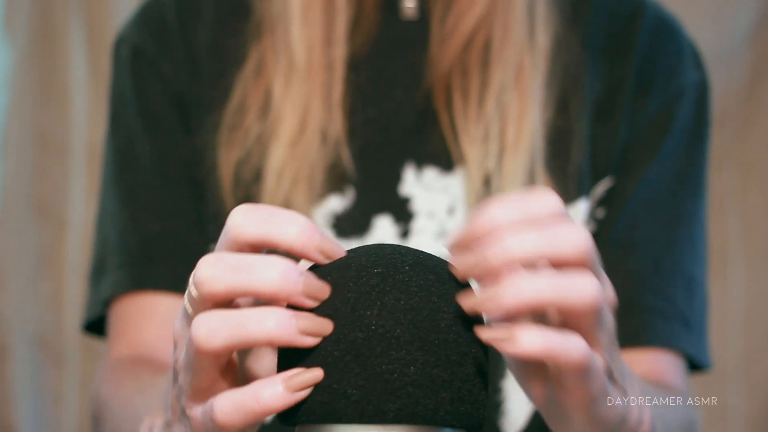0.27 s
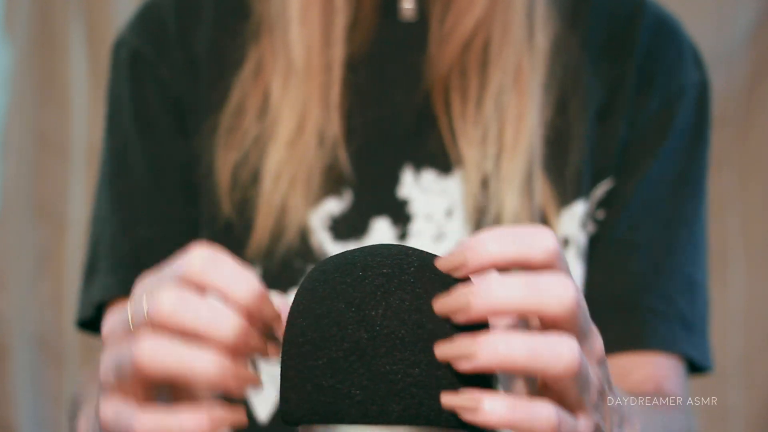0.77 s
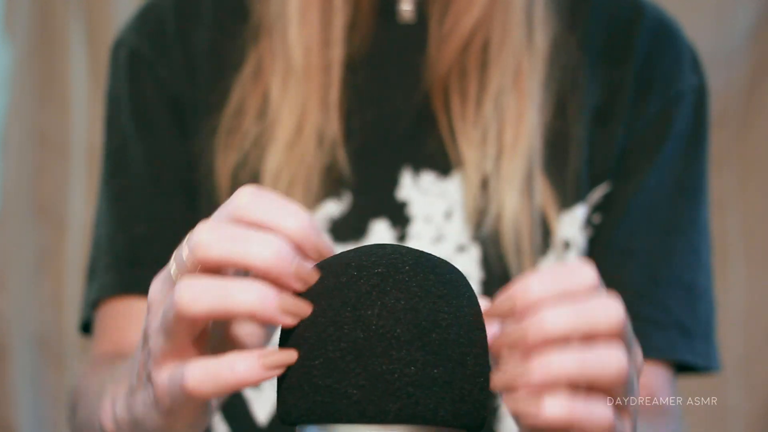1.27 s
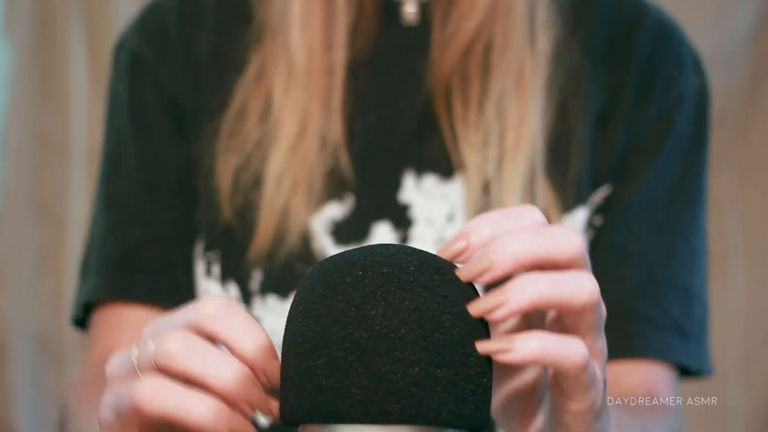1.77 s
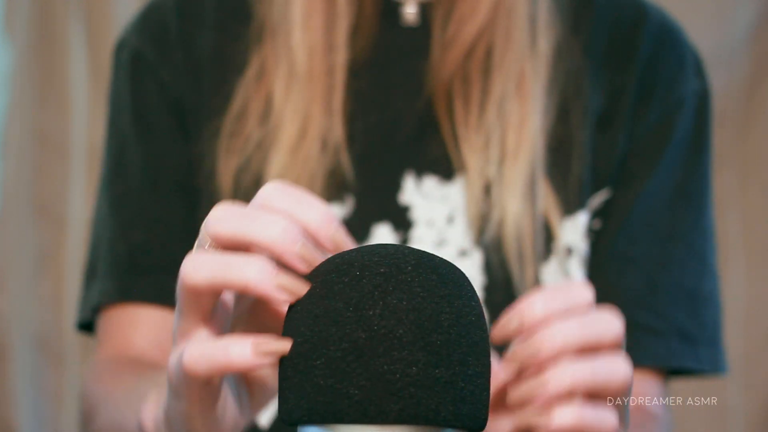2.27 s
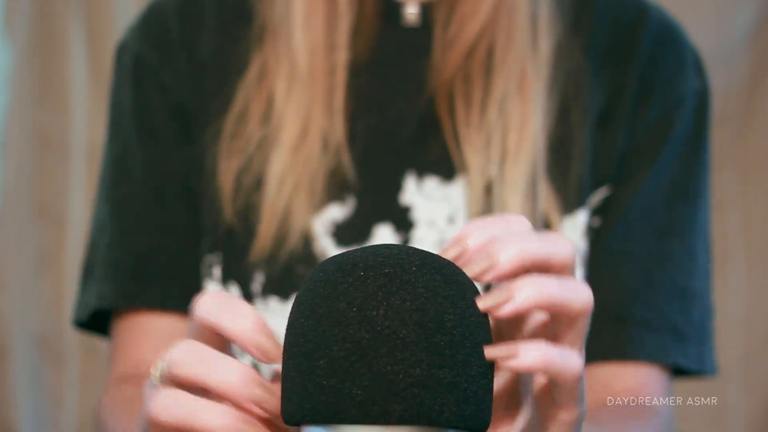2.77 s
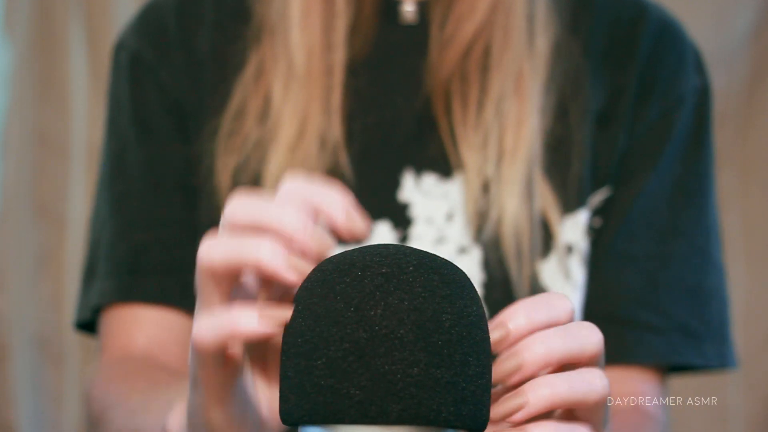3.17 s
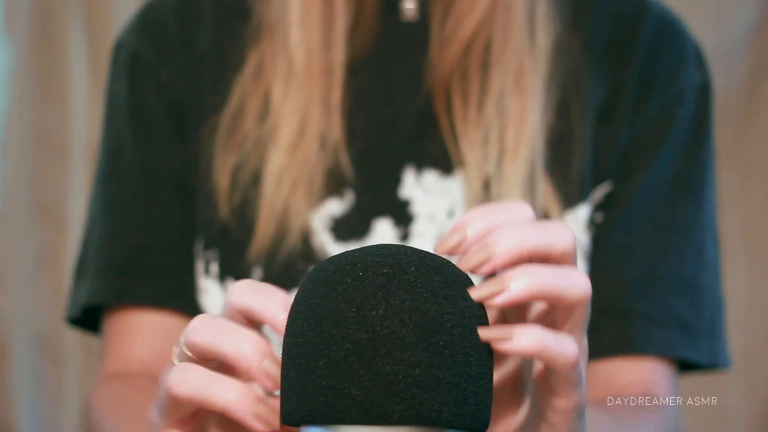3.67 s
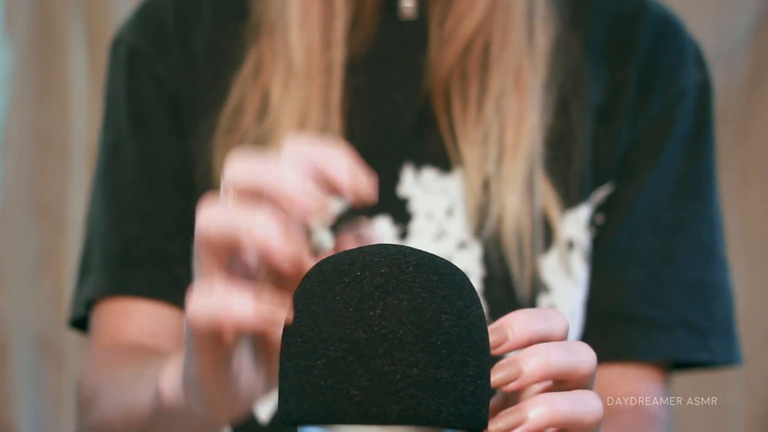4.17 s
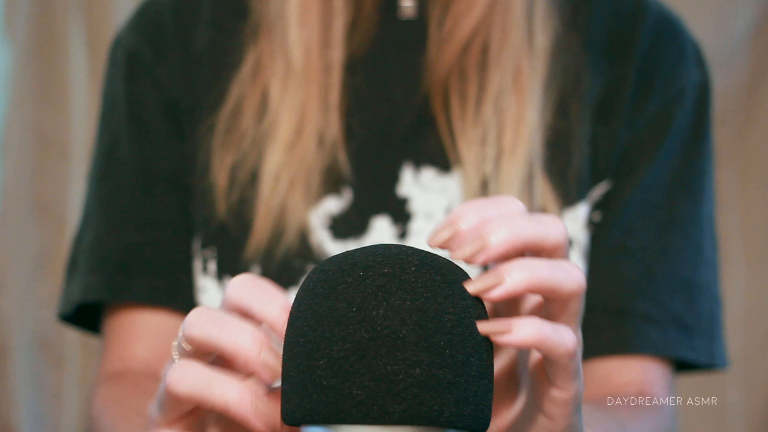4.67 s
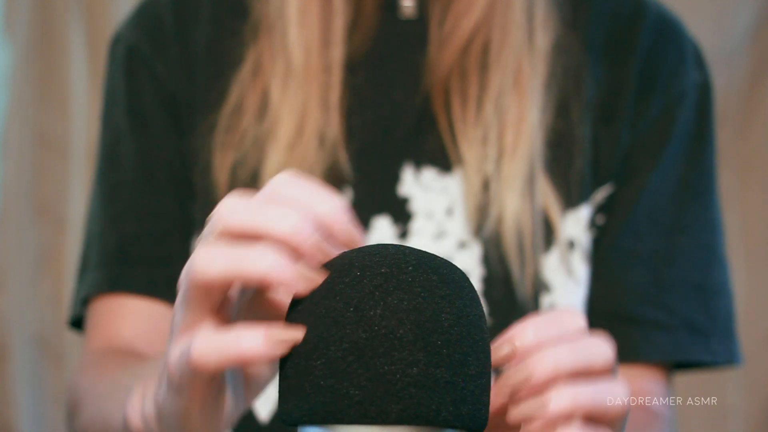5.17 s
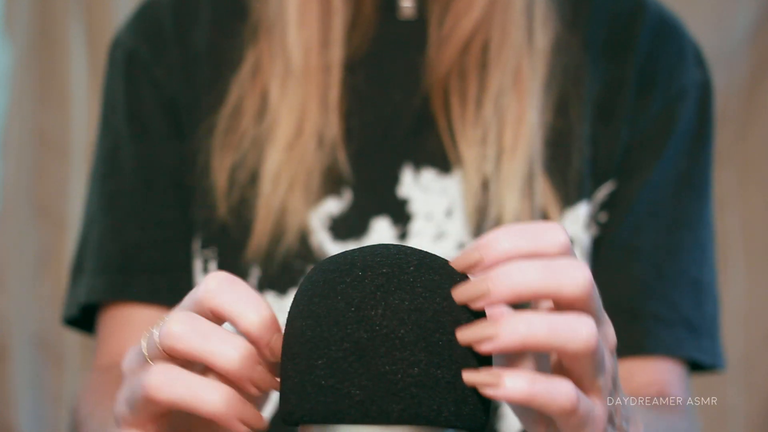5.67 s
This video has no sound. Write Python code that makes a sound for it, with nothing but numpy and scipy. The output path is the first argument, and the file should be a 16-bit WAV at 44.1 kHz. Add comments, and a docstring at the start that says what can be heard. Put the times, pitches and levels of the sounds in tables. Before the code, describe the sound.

Two hands take turns dragging long fingernails down a foam microphone cover, each stroke about half a second, one starting as the other lifts. Dense gritty crackle rides over a low boom from the shaken microphone. Small nail ticks, hollow foam plucks and a few soft air thumps, mainly on the left, punctuate the strokes. Extremely close, dry stereo, no audible room.

```python
"""Fingernails on a foam microphone cover

Two hands take turns dragging their fingernails down the foam cover of a stereo microphone.
Foam cells snap under the nails as dense random clicks over friction hiss; pinched pockets of foam ring and glide.
The drag shakes the microphone body, whose low modes boom, and each hand colours the two capsules in its own way.
Nails tick as they let go and pluck the foam; landing fingertips push puffs of air, mainly at the left capsule."""
import sys
import numpy as np
from scipy import signal
from scipy.fft import rfft, irfft, next_fast_len
from scipy.io import wavfile
from scipy.ndimage import uniform_filter1d

SR = 44100
rng = np.random.default_rng(int(sys.argv[2]) if len(sys.argv) > 2 else 0)


def bounce(signal):
    """Save signal as a 16-bit WAV file at the path given by the first command-line argument."""
    frames = np.transpose(np.atleast_2d(signal))
    limited = np.clip(frames, -1, 1)
    pcm = np.round(limited * 32767).astype(np.int16)
    wavfile.write(sys.argv[1], SR, pcm)


N = 260631
TIME_S = np.arange(N) / SR
SIZE = next_fast_len(N + SR // 2)   # padded, so filter tails do not wrap round
HZ = np.maximum(np.arange(SIZE // 2 + 1) * SR / SIZE, 1)
CLOSENESS = 0.16   # added to every likeness in the tables


def amp(db):
    """dB to gain."""
    return 10 ** (np.asarray(db) / 20)


def rms_one(x):
    """Scales each row to rms 1."""
    return x / np.sqrt(np.mean(x ** 2, axis=-1, keepdims=True))


def in_time(rows):
    """Draws straight lines between the rows of a curve table, one curve per column."""
    point_s, *columns = np.transpose(rows)
    return [np.interp(TIME_S, point_s, column) for column in columns]


def swell(centre_s, length_s, power=2):
    """A smooth rise and fall from 0 to 1 and back, down to 1/e at both ends of its length."""
    return np.exp(-(2 * (TIME_S - centre_s) / length_s) ** power)


def drift(rate_hz):
    """Slow chance: noise through a double one-pole low-pass, scaled to rms 1."""
    r = np.exp(-2 * np.pi * rate_hz / SR)
    noise = rng.standard_normal(N + SR)
    return rms_one(signal.lfilter([1], [1, -2 * r, r * r], noise)[SR:])


def even_out(swing, span_s):
    """Evens the power of a stereo swing over a span, with one gain for both channels."""
    power = uniform_filter1d(np.mean(swing ** 2, axis=0), round(span_s * SR))
    return swing * np.sqrt(power.mean() / power)


def to_capsules(pair, left_db, right_db, likeness, lead_rad):
    """Mixes the spectra of two unrelated streams to a stereo likeness and colours each capsule."""
    alike = np.clip(likeness + CLOSENESS, -.98, .98)
    common = np.sqrt((1 + alike) / 2) * pair[0]
    opposed = np.sqrt((1 - alike) / 2) * pair[1]
    left = amp(left_db) * (common + opposed)
    right = amp(right_db) * (common - opposed) * np.exp(1j * lead_rad)
    return np.sqrt(SR / 2) * np.array([left, right])


def struck(events, shape):
    """Places one shape per event, turned down on the weaker side."""
    out = np.zeros((2, N + SR))
    for start_s, level_db, left_minus_right_db, *rest in events:
        pulse, at = shape(*rest), round(start_s * SR)
        sides = amp([[min(left_minus_right_db, 0)], [min(-left_minus_right_db, 0)]])
        out[:, at:at + len(pulse)] += amp(level_db) * sides * pulse
    return out[:, :N]


# fingertips landing on the foam: (start_s, level_db, left_minus_right_db, pitch_hz)
LANDING_PUFFS = [(0.429, -42, 6, 72.7), (1.081, -13, 23, 32.3), (3.114, -18, 15, 53.8),
                 (4.145, -18, 7, 56.5), (4.549, -24, 7, 56.5), (5.074, -7.5, 25, 57.4),
                 (5.108, -12, 18, 48)]


def puff(pitch_hz):
    """A soft push of air: a cycle or two of a low tone that swells and dies."""
    t = np.arange(SR // 10) / SR
    envelope = np.exp(-((t - .026) / 0.0098) ** 2)
    return -amp(-5.5) * envelope * np.sin(2 * np.pi * pitch_hz * (t - .028))


def shaken(mode_hz, width_hz):
    """One body mode: noise through a resonance squared for steep skirts, its level evened over 150 ms."""
    ring = 1 / (1 + 1j * (HZ - mode_hz ** 2 / HZ) / width_hz) ** 2
    swing = irfft(rfft(rng.standard_normal((2, SIZE))) * ring, SIZE)[:, :N]
    return rfft(even_out(swing, span_s=0.15), SIZE)


# low modes of the microphone body as each hand shakes them, levels before the shake of the strokes:
# (pitch_hz, width_hz, left_db, right_db, likeness 0-1, right_lead_rad)
RIGHT_BODY_MODES = [(124.4, 17.6, -58, -52, 1, -3), (166, 17.7, -47, -40.5, 0.88, 0),
                    (186.9, 21, -39, -62.5, 1, 0.5), (206.8, 15.8, -36.5, -53, 0.97, -1.76)]
LEFT_BODY_MODES = [(105.8, 7, -51, -46, 0.67, -2.5), (149.6, 12.5, -43, -43, 0.91, -2),
                   (168.6, 16.7, -34, -38, 0.74, -2.5), (205, 37, -43, -76, 0.62, -2.5)]


def body(modes, shake_db):
    """Body modes swing together; their summed level is evened over 73 ms, then the hand sets the strength."""
    spectrum = sum(to_capsules(shaken(hz, width_hz), *capsules) for hz, width_hz, *capsules in modes)
    swing = irfft(spectrum, SIZE)[:, :N]
    return even_out(swing, span_s=0.073) * amp(shake_db)


# a nail catching and letting go: (start_s, level_db, left_minus_right_db)
NAIL_TICKS = [(0.2533, -44, 5.5), (0.4379, -46, 8), (0.5806, -40, -0.5), (0.631, -33.5, -8),
              (0.6614, -36, -11), (0.669, -38, -7), (0.7085, -41, -8), (0.7535, -36, -8), (0.7745, -35, -8),
              (0.784, -36.5, -8), (0.7965, -39, -8), (0.8255, -35, -11), (0.848, -42, -8),
              (0.8954, -44, -10.0), (1.3932, -49, 25), (1.5269, -51, 4), (1.6955, -40, -7.5),
              (2.0178, -41, -12.0), (2.7566, -41, -9.5), (2.8379, -44, -9.5), (3.3353, -50, 2),
              (3.4391, -48, 0), (3.6152, -50, -3.5), (3.6691, -41, -7), (3.7404, -44, -8),
              (3.9624, -50, -9.5), (4.4204, -43, -6), (4.4887, -42, 5), (4.5426, -46, 4),
              (4.6897, -38, -14.0), (4.7331, -41, -11.5), (4.8199, -35, -14), (4.839, -41, -13),
              (4.883, -43, -12), (5.3308, -51, 7), (5.5074, -34, -9), (5.5927, -40, -5.0),
              (5.6351, -44, -9.5), (5.7174, -35, -14.5)]
# what the nail rings with, levels before a random scatter: (pitch_hz, level_db, decay_s)
NAIL_RINGS = [(5200, 6, 0.00012), (13300, 7, 0.00015)]
DELAY_S = 0.0011   # delay from start_s to the crack


def tick():
    """A short bright crack: the released nail rings for a cycle or two."""
    t = np.maximum(np.arange(SR // 100) / SR - DELAY_S, 0)
    crack = 0
    for hz, level_db, decay_s in NAIL_RINGS:
        gain = amp(level_db + rng.normal(0, 1.5))
        crack = crack + gain * np.exp(-t / decay_s) * np.sin(2 * np.pi * hz * t)
    return rng.choice([-1, 1]) * crack


# a nail digging in and plucking the foam: (start_s, level_db, left_minus_right_db, pitch_hz)
FOAM_PLUCKS = [(1.687, -23, 4, 610), (1.75, -21, 8.0, 507), (0.94, -23, 6, 483), (0.985, -27, 9, 520),
               (1.048, -39, 8, 477), (2.171, -34, 5, 896), (2.377, -23.5, 0, 475), (3.465, -25.5, -2, 776),
               (3.772, -22, 7, 620), (4.086, -27, 5, 580), (4.733, -19.5, 9, 620), (4.881, -19, 18, 541),
               (5.753, -24, 10, 638)]


def pluck(pitch_hz):
    """A short damped ring of the foam."""
    t = np.arange(SR // 25) / SR
    decay = np.exp(-t / 0.0035)   # s
    return rng.choice([-1, 1]) * decay * np.sin(2 * np.pi * pitch_hz * t) * 1.1


def snaps(per_s, spread_db):
    """Foam cells snap at random moments with uneven size, as two click streams at rms 1."""
    sizes = amp(spread_db * np.minimum(rng.exponential(1, N), 2.8))
    struck_now = rng.random(N) < per_s / SR
    return rms_one(sizes * struck_now * rng.standard_normal((2, N)))


def gliding(hz, gain, width_hz, *capsules):
    """Snaps ring in a resonance whose pitch moves: shifted to 0 Hz, low-passed twice, shifted back."""
    turn = np.exp(2j * np.pi * np.cumsum(hz) / SR)
    r = np.exp(-np.pi * width_hz / SR)
    cells = snaps(per_s=900, spread_db=2.5)
    smoothed = signal.lfilter([(1 - r) ** 2], [1, -2 * r, r * r], cells * gain / turn)
    return to_capsules(rfft(2 * (turn * smoothed).real, SIZE), *capsules)


# the scrape sings briefly in a narrow band: (centre_s, length_s, start_hz, end_hz, level_db)
RIGHT_SINGING = [(0.95, 0.2, 560, 450, 1), (1.88, 0.25, 550, 408, 2.5), (2.9, 0.3, 565, 457, 2),
                 (3.83, 0.24, 650, 466, -1), (4.85, 0.24, 640, 428, 5), (5.02, 0.072, 1730, 1720, -8),
                 (5.8, 0.12, 596, 476, -2)]
LEFT_SINGING = [(0.66, 0.1, 1200, 1500, -6), (1.3, 0.08, 2250, 2260, -12), (1.61, 0.11, 750, 1150, 7),
                (2.65, 0.14, 650, 1100, 2), (3.54, 0.31, 750, 1100, 3), (4.4, 0.18, 755, 900, 4),
                (4.62, 0.1, 900, 1190, -7), (5.4, 0.1, 890, 1190, -2), (5.57, 0.086, 850, 1300, 0)]
# that band, levels before those above: (width_hz, left_db, right_db, likeness 0-1, right_lead_rad)
RIGHT_SINGING_BAND = (120, -62, -69, 0.8, 1.5)
LEFT_SINGING_BAND = (160, -65, -69, 1, -2.5)


def singing_scrape(songs, band):
    """Snaps excite a narrow gliding resonance that swells and fades."""
    glide, gain = [], 0
    for centre_s, length_s, start_hz, end_hz, level_db in songs:
        glide += [(centre_s - length_s / 2, start_hz), (centre_s + length_s / 2, end_hz)]
        gain = gain + amp(level_db) * swell(centre_s, length_s, power=4)
    hz, = in_time(glide)
    return irfft(gliding(hz, gain, *band), SIZE)[:, :N]


# pockets of foam pinched under the nails, levels before the scrape level of the strokes:
# (land_hz, lift_hz, width_hz, left_db, right_db, likeness 0-1, right_lead_rad)
RIGHT_FOAM_POCKETS = [(817, 419, 190, -61.5, -72, 0.86, 1.8), (2250, 1480, 420, -83.5, -88.5, 0.65, 4.4)]
LEFT_FOAM_POCKETS = [(620, 1187, 210, -78.5, -66, 0.27, -2.5), (723, 748, 180, -65, -70, 0.92, -2.5),
                     (1350, 1490, 260, -78.5, -75, 0.89, -4)]


def pocket(strokes, scrape_db, land_hz, lift_hz, *band):
    """A pinched pocket resonates and glides in pitch as the nails travel along each stroke."""
    glide = []
    for land_s, lift_s, *_ in strokes:
        glide += [(land_s, land_hz), (lift_s, lift_hz)]
    hz, = in_time(glide)
    return gliding(hz, amp(scrape_db), *band)


# centres of the squeeze, scrape, scratch and rasp layers: (pitch_hz)
LAYER_CENTRES_HZ = [80, 600, 3200, 10500]
# one band of the scratch swells or fades for a while: (centre_s, length_s, pitch_hz, change_db)
RIGHT_BAND_TINTS = [(0.76, 0.3, 5200, 2.5), (0.76, 0.25, 14000, 3), (0.946, 0.25, 2110, 2),
                    (1.744, 0.12, 1400, -2), (2.92, 0.15, 14000, 6), (2.95, 0.25, 523, 4.5),
                    (3.8, 0.3, 5500, -3.5), (4.85, 0.18, 13500, 7.5), (4.84, 0.12, 1900, 3),
                    (4.86, 0.2, 520, 9), (0.74, 0.17, 3500, -4), (2.798, 0.1, 530, 6),
                    (5.75, 0.22, 13500, 4)]
LEFT_BAND_TINTS = [(0.45, 0.4, 5840, 0), (1.3, 0.083, 2260, 5), (1.58, 0.16, 6000, 5),
                   (1.62, 0.15, 960, 2.5), (2.55, 0.2, 6030, 8), (2.64, 0.18, 850, 7.5),
                   (0.66, 0.08, 1510, 3), (3.5, 0.27, 850, 7), (3.5, 0.27, 330, -6), (4.42, 0.43, 850, 2),
                   (4.45, 0.4, 5600, 0), (4.5, 0.28, 330, 2), (5.45, 0.37, 1350, 4.5)]
BAND_HZ = np.geomspace(38, 14000, num=18)
TINT_OCTAVES = 0.42   # width of a tint, down to 1/e of its dB at the edges
SNAP_OCTAVES = 2.6   # a snap falls to 1/e this far from its own pitch
SNAP_DB, SNAP_DB_PER_OCTAVE = -1.0, 0.1   # snaps over hiss at 2 kHz, and the rise with pitch


def scratching(layers_db, tints):
    """Snaps over fine friction hiss, band by band: each snap fills its own span of pitch."""
    cells = snaps(per_s=2200, spread_db=3.8)
    hiss = rng.standard_normal((2, N))
    grip_db = 1.11 * (drift(197) + 0.4 * drift(9))   # shared by all bands
    snap_octave = rng.uniform(-3.5, 4, N)   # pitch of each snap, from 2 kHz
    layers = np.eye(len(LAYER_CENTRES_HZ))
    weights = np.array([np.interp(np.log(BAND_HZ), np.log(LAYER_CENTRES_HZ), row) for row in layers])
    out = 0
    for k, hz in enumerate(BAND_HZ):
        octave = np.log2(hz / 2000)
        band_snaps = rms_one(cells * np.exp(-((octave - snap_octave) / SNAP_OCTAVES) ** 2))
        foam = rms_one(hiss + amp(SNAP_DB + SNAP_DB_PER_OCTAVE * octave) * band_snaps)
        # the colour wanders as the nails travel over the cover, and flutters faster on top
        level_db = weights[:, k] @ layers_db + grip_db + 0.5 * drift(4.9) + 0.8 * drift(75)
        for centre_s, length_s, tint_hz, change_db in tints:
            nearness = np.exp(-(2 * np.log2(hz / tint_hz) / TINT_OCTAVES) ** 2)
            level_db += change_db * nearness * swell(centre_s, length_s)
        # neighbouring bands crossfade
        share = np.interp(np.log(HZ), np.log(BAND_HZ), np.arange(len(BAND_HZ)) == k)
        out = out + share * rfft(foam * amp(level_db), SIZE)
    return out


# strokes of a hand, layer strengths added to the course, pressure rising by the last column from land to lift:
# (land_s, lift_s, squeeze_db, shake_db, scrape_db, scratch_db, rasp_db, pressure_rise_db)
RIGHT_HAND_STROKES = [(-0.45, 0.142, -0.5, -3.5, 4, -2, -7, -1.5), (0.518, 1.146, 7, 0, 1.5, 3.5, 4, -5.5),
                      (1.573, 2.147, 0.5, 1, 2, 1.5, 2, -6.5), (2.616, 3.199, 4.5, 2, -1, -1.5, 0, -3),
                      (3.548, 4.113, 2.5, -2, -0.5, -1.5, 1, -6.5), (4.583, 5.088, 1, 4, 1, 2, 3, -3.5),
                      (5.466, 6.04, 4.5, 1.5, -3, 3, 3.5, 2.5)]
LEFT_HAND_STROKES = [(0.009, 0.718, -3, -3.5, -1.5, 2, 0.5, 0), (1.1, 1.683, -6.5, 1, -3, 2, -1, 0),
                     (2.162, 2.733, -2.5, 1, -0.5, -3, -4.5, 0.0039),
                     (3.09, 3.669, -9, -2, -2.3, -7.5, -7.5, 0.011), (4.193, 4.683, -0.5, 5, 1, -2, -3, 0),
                     (5.086, 5.635, 1.5, -0.5, -1.5, 2.5, -1.5, 0)]
# course of every stroke: (share of the stroke 0-1, squeeze_db, shake_db, scrape_db, scratch_db, rasp_db)
RIGHT_STROKE_COURSE = [(0.0, -6, -9.5, -12, -8, -12.5), (0.12, -3, -5, -10, -8.5, -7.5),
                       (0.25, -4, -4, -3, -6.5, -4), (0.4, -4.5, -2, 0.5, 0.5, -2.5),
                       (0.5, -8.5, -1, -0.5, 1, -2.5), (0.62, 0, -2, -1.5, 1.5, -4),
                       (0.75, -8.5, 2, -3, 1, -6.5), (0.88, -3.5, 0.5, -4, 1, -8.5),
                       (1.0, 0, -3.5, -7.5, -5, -15)]
LEFT_STROKE_COURSE = [(0.0, -5, -14, -6, -8.5, -12), (0.12, -3, -2, -2, -2, -6.5),
                      (0.25, 1, -4.5, 0.5, -2.5, -5.5), (0.4, 0, -4.5, -1, -2, -7),
                      (0.55, -9.5, -2, -1.5, -0.5, -6), (0.7, 4, -6.5, -2, -2, -5.5),
                      (0.85, -17.5, 1, 2.5, -2, -3), (0.93, -5.5, -2, 1.5, 0, -5.5),
                      (1.0, -14, -12, -3.5, -9.5, -8)]
# a hand between strokes, barely touching: (squeeze_db, shake_db, scrape_db, scratch_db, rasp_db)
RIGHT_REST_DB = (-2, -14.5, -11.5, -13.5, -19)
LEFT_REST_DB = (-36, -10.5, -16.5, -16.5, -21)
# the nails dig in or slacken for a moment, as changes:
# (centre_s, length_s, squeeze_db, shake_db, scrape_db, scratch_db, rasp_db)
RIGHT_NAIL_GRIPS = [(0.086, 0.093, 2, -16, 4, 0, 4), (0.323, 0.2, 7, -15, 7, 12, -2),
                    (0.644, 0.12, -0.5, -0.5, -0.5, 3.5, -3), (0.768, 0.18, -4, 2, -5, 3.5, 1.5),
                    (0.861, 0.061, 2, -6.5, -3.2, -0.5, -2), (0.947, 0.1, -4, 4.5, 2.5, -0.5, 2.5),
                    (1.02, 0.047, 0, 1.5, 0, -2, 1), (1.123, 0.21, 1, 1.5, 4, -1.5, 5),
                    (1.723, 0.24, -1, -12.5, -6, -1.5, -3), (1.917, 0.13, 5, 8, 2.5, -1, 1),
                    (2.958, 0.12, -3, 4.5, 0, 3, 0), (3.045, 0.068, -2, 1.5, 3, -0.5, 2),
                    (3.18, 0.059, 1, 7.5, 6, 4.5, -1), (3.28, 0.14, -15, 1.5, -11, -9, -3),
                    (3.855, 0.16, 3.5, 11, 2.5, 3, 3.5), (3.98, 0.11, -2, -5, -2.5, -1, -2.5),
                    (4.094, 0.032, -13, 9, 2.5, 9, 5), (4.835, 0.037, 3, 3.5, 0.5, 1, 2),
                    (4.968, 0.093, 2, 5.5, 4, 1.5, 3), (5.552, 0.13, 4, 0.5, 10, 9, 5),
                    (5.782, 0.086, -2, -7, 5.5, 1, 1), (5.9, 0.12, 3, 3.5, 6, 1.5, 1)]
LEFT_NAIL_GRIPS = [(0.08, 0.17, -7, -14, 1.5, 0.5, 1), (0.21, 0.17, -2.5, -3, -1, -7.5, -5.5),
                   (0.54, 0.31, 2, 4, 0, 1, -1), (0.81, 0.094, -13, 1, 11, 11, 5),
                   (1.27, 0.13, 1, 3, 1.5, 2.5, 0), (1.44, 0.16, 6, -5, -3, -2, -3),
                   (1.61, 0.12, 18, -1, 4, 0.5, -2), (2.301, 0.055, -3, 7, -2, 6, 3),
                   (2.43, 0.08, -5, 7, 2, 1.5, 1), (2.55, 0.084, 4, -2, 0, 3, -1),
                   (2.72, 0.061, -19, 12, -1, 6.5, 1), (3.28, 0.14, 6, 0.5, -2, 1, -1.5),
                   (3.51, 0.13, 12, 5, 4, 5.5, 4), (4.22, 0.099, 3, 2.5, 2.5, 2.5, 0),
                   (4.42, 0.033, -10, 0, 1.5, 3.5, 1), (4.53, 0.071, -16, -5, -3, -3, -4),
                   (4.62, 0.075, -23, -8, 1, -4, -4), (5.08, 0.048, 5, -6, -4, -4, 1),
                   (5.17, 0.08, 0, -1, 2.5, 1, 3.5), (5.281, 0.12, -11, -1.5, -7, -6.5, -4),
                   (5.42, 0.099, 2, 2.5, 2, 0, 1)]


def stroking(strokes, course, resting_db, grips, landing_s, lifting_s):
    """Level of each layer over time: land, run the course at the stroke's strengths, lift, rest."""
    rows = []
    for land_s, lift_s, *strength_db, pressure_rise_db in strokes:
        rows.append((land_s - landing_s, *resting_db))
        for share, *course_db in course:
            levels_db = np.add(course_db, strength_db) + pressure_rise_db * (share - .5)
            rows.append((land_s + share * (lift_s - land_s), *levels_db))
        rows.append((lift_s + lifting_s, *resting_db))
    levels_db = np.array(in_time(rows))
    for centre_s, length_s, *change_db in grips:
        levels_db += np.outer(change_db, swell(centre_s, length_s))
    return levels_db


# path from a hand to the capsules, levels before hollows and strokes:
# (pitch_hz, left_db, right_db, likeness 0-1, right_lead_rad)
RIGHT_HAND_PATH = [(25.0, -58, -58.5, 0.08, 3.4), (60.6, -51.5, -56.5, 0.78, 3.35),
                   (277, -59.5, -62, 0, 5.12), (330, -59.5, -73, 0.3, 2.1), (454, -55.0, -65.5, 0.53, 0.8),
                   (820, -62.5, -74, 0.5, 1.52), (1050, -67.5, -72.5, 0.14, 3.83),
                   (1720, -75.5, -77.5, 0.18, 4.1), (2660, -96, -84.5, 0.05, 4.8),
                   (3680, -99.5, -83.5, 0.5, 4.7), (6370, -101.5, -92.5, 0.1, 2.5),
                   (10500, -106.0, -94.5, 0.5, 2.5), (13500.0, -104.0, -94, 0.18, 2.7),
                   (15800.0, -107.0, -94, 0.19, 3.7)]
LEFT_HAND_PATH = [(25.0, -58, -59.5, 0.66, -2), (101, -45, -51, 0.55, -3.5), (235, -64, -54.5, 0.95, 0.4),
                  (371, -65.5, -57.5, 0.14, -3), (442, -58, -56.5, 0.75, -3.5),
                  (716, -62.5, -65, 0.22, -2.5), (1110, -66.5, -67.5, 0.082, -2),
                  (1740, -71, -74.5, 0.52, -4), (2620, -81, -82, 0.11, -2), (3700, -82, -88, 0.21, -2.5),
                  (6300, -89.5, -95, 0.35, -1.5), (10400, -90, -92, 0.12, 2.5),
                  (13200, -90, -100.0, 0.24, 0.5), (15800.0, -90, -102.0, 0.21, -2)]
# hollows between foam, grille and capsules, on top of the path: (pitch_hz, width_hz, left_db, right_db)
RIGHT_HAND_HOLLOWS = [(104, 26, -1.5, 3.5), (656, 170, -4.5, 1.5), (774, 93, -0.5, 2), (1300, 440, -4, 0.5),
                      (1870, 370, -1.5, 4.5), (5240, 1200, 3.5, 0.5), (9360, 3500, -1, 1),
                      (13300, 2300, -5, 0.5)]
LEFT_HAND_HOLLOWS = [(104, 47, -9, -4.5), (208, 53, 11.5, -17), (412, 87, -9.5, 0), (640, 120, 2, 2.5),
                     (836, 70, -2, 3), (970, 220, -3.5, 0), (1280, 360, 1, 0), (2910, 720, -1.2, -5.5),
                     (6070, 840, 4, 2.5)]


def hand(levels_db, path, hollows, modes, strokes, pockets, tints):
    """One hand: the scratch along its path, the pinched pockets, and the shaken body modes."""
    squeeze_db, shake_db, *scratch_db = levels_db
    path_hz, *columns = np.transpose(path)
    left_db, right_db, likeness, lead_rad = [np.interp(np.log(HZ), np.log(path_hz), c) for c in columns]
    for hollow_hz, width_hz, left_peak_db, right_peak_db in hollows:
        peak = 1 / (1 + (2 * (HZ - hollow_hz) / width_hz) ** 2)
        left_db = left_db + left_peak_db * peak
        right_db = right_db + right_peak_db * peak
    scratch = scratching(np.array([squeeze_db, *scratch_db]), tints)
    foam = to_capsules(scratch, left_db, right_db, likeness, lead_rad)
    foam += sum(pocket(strokes, scratch_db[0], *row) for row in pockets)
    return irfft(foam, SIZE)[:, :N] + body(modes, shake_db)


def scene():
    """Both hands with their landings, catches, plucks and singing scrapes."""
    right_db = stroking(RIGHT_HAND_STROKES, RIGHT_STROKE_COURSE, RIGHT_REST_DB, RIGHT_NAIL_GRIPS,
                        landing_s=0.17, lifting_s=0.08)
    left_db = stroking(LEFT_HAND_STROKES, LEFT_STROKE_COURSE, LEFT_REST_DB, LEFT_NAIL_GRIPS,
                       landing_s=0.025, lifting_s=0.04)
    accents = struck(LANDING_PUFFS, puff) + struck(NAIL_TICKS, tick) + struck(FOAM_PLUCKS, pluck)
    singing = (singing_scrape(RIGHT_SINGING, RIGHT_SINGING_BAND)
               + singing_scrape(LEFT_SINGING, LEFT_SINGING_BAND))
    right_hand = hand(right_db, RIGHT_HAND_PATH, RIGHT_HAND_HOLLOWS, RIGHT_BODY_MODES,
                      RIGHT_HAND_STROKES, RIGHT_FOAM_POCKETS, RIGHT_BAND_TINTS)
    left_hand = hand(left_db, LEFT_HAND_PATH, LEFT_HAND_HOLLOWS, LEFT_BODY_MODES,
                     LEFT_HAND_STROKES, LEFT_FOAM_POCKETS, LEFT_BAND_TINTS)
    return accents + singing + right_hand + left_hand


def record(dry):
    """A steep low-pass cuts the top above 15790 Hz."""
    low_pass = signal.ellip(14, .3, 60, 15790, fs=SR, output="sos")
    return signal.sosfilt(low_pass, dry)


dry = scene()
out = record(dry)
bounce(out)
```